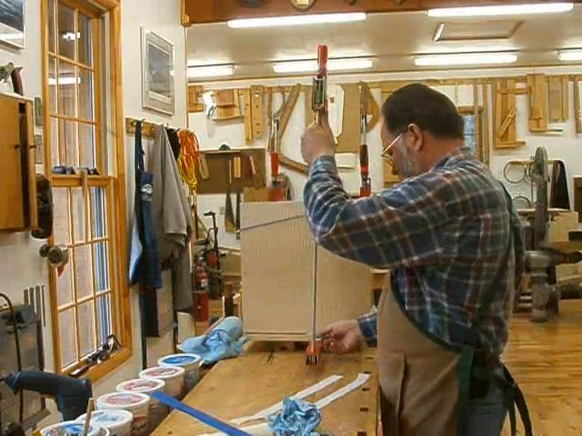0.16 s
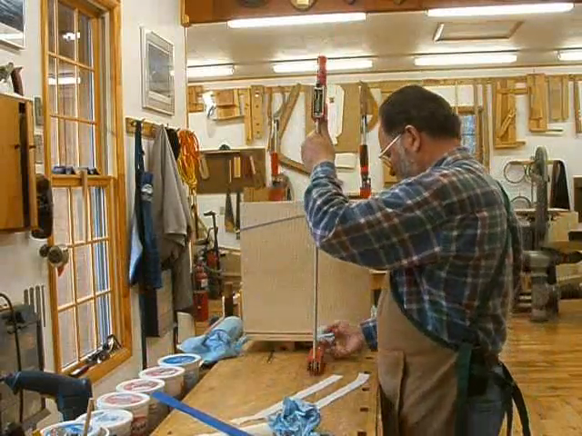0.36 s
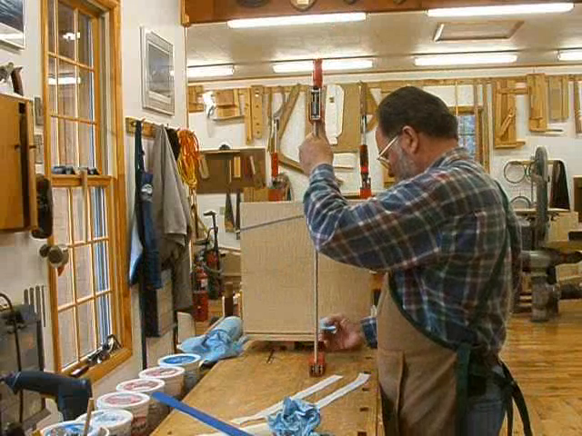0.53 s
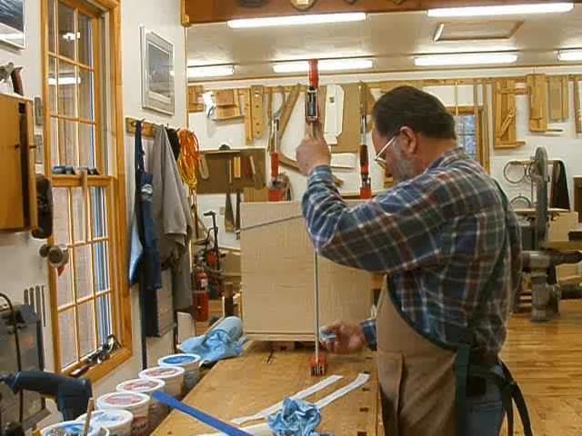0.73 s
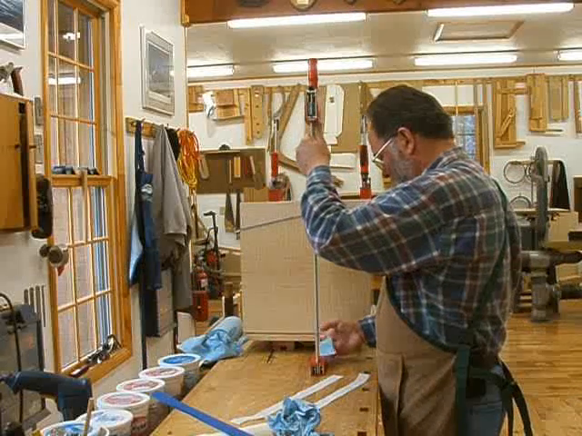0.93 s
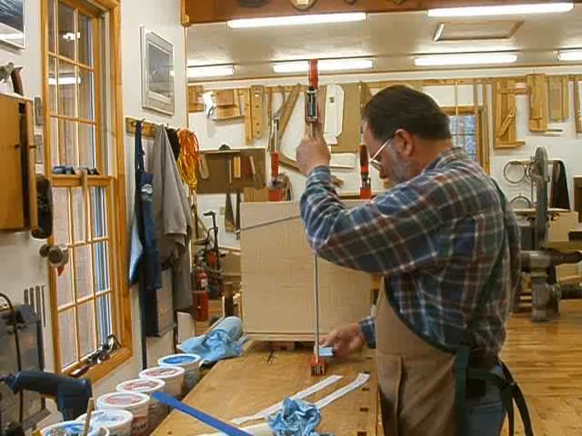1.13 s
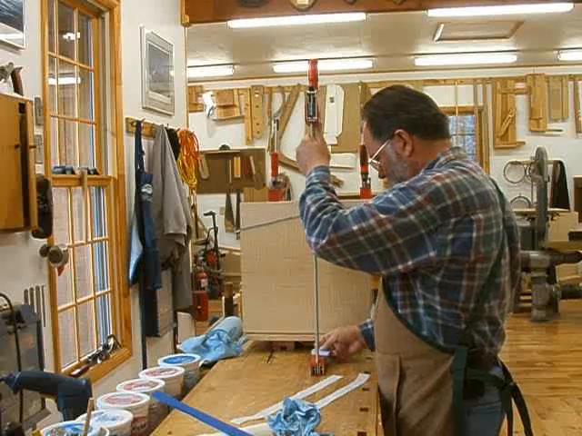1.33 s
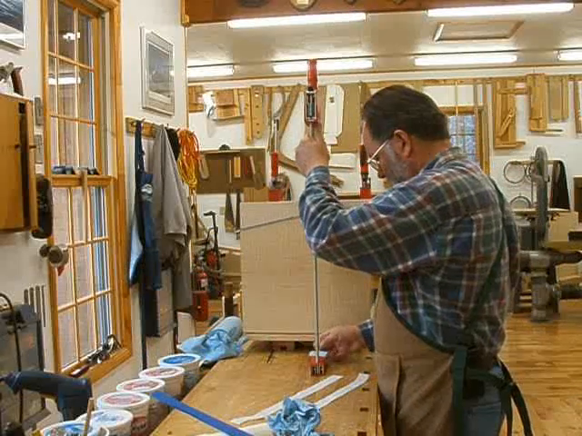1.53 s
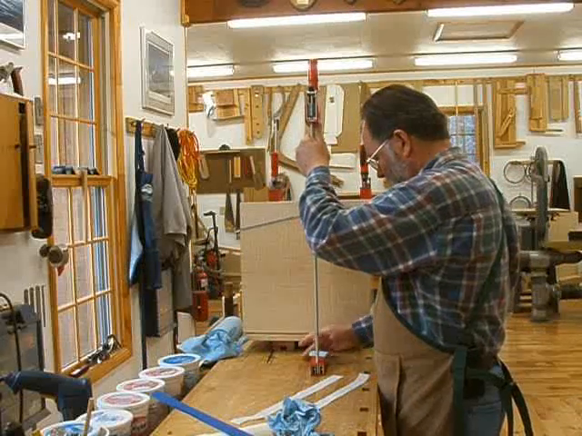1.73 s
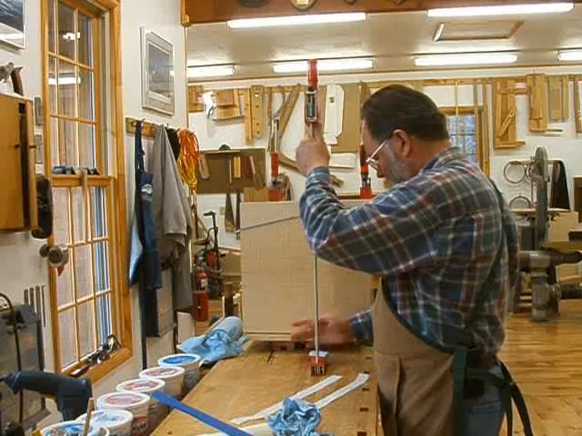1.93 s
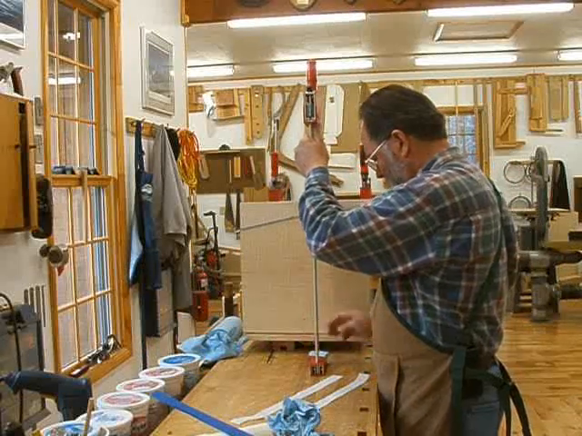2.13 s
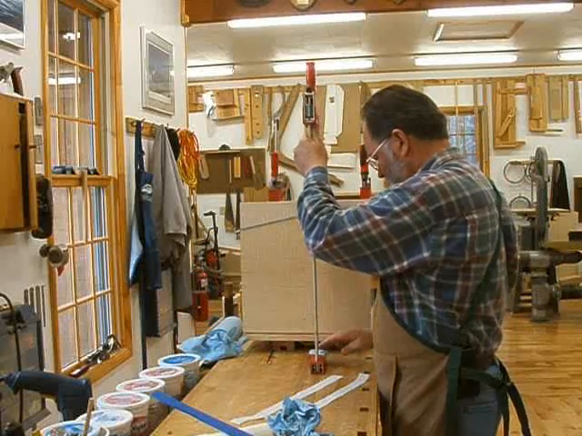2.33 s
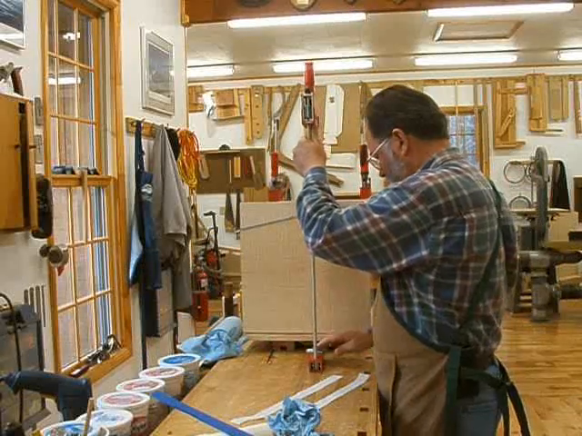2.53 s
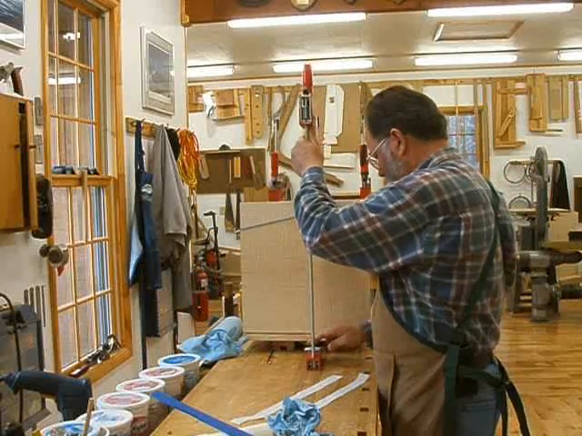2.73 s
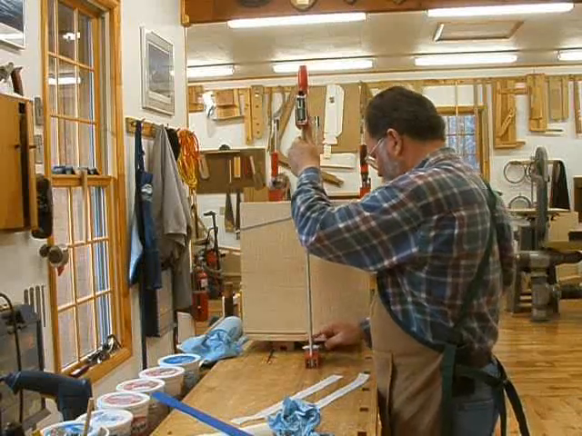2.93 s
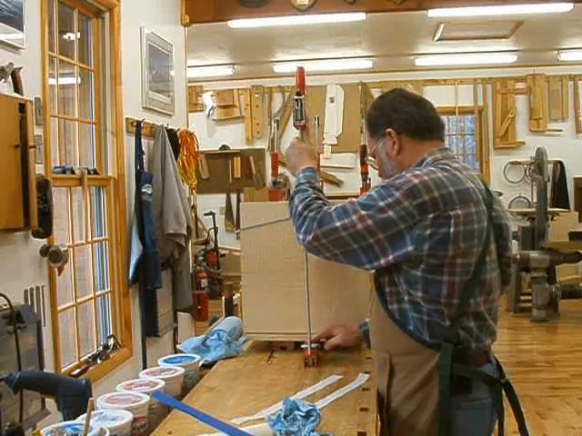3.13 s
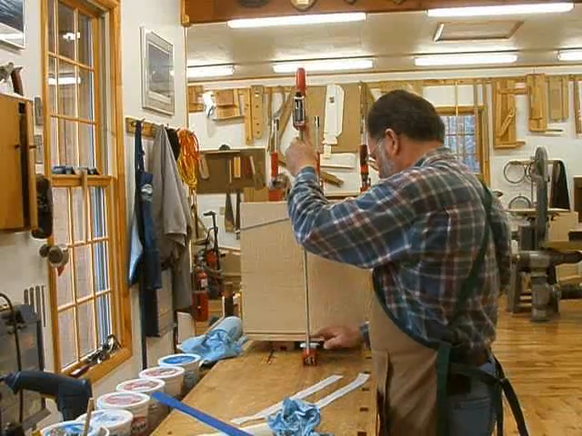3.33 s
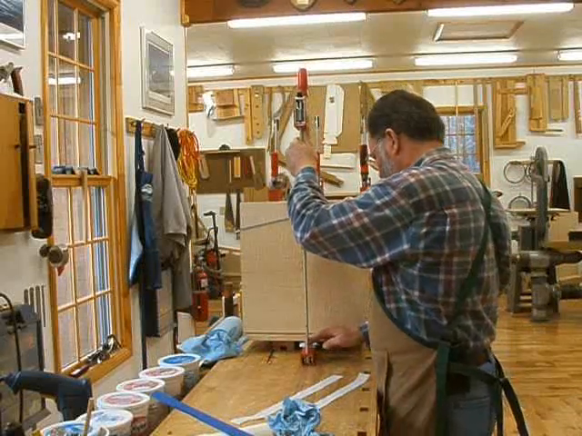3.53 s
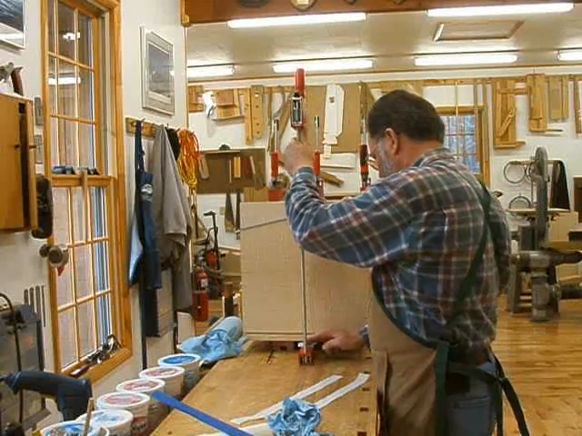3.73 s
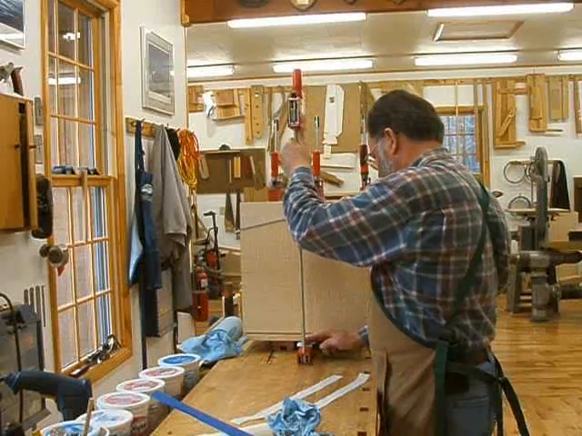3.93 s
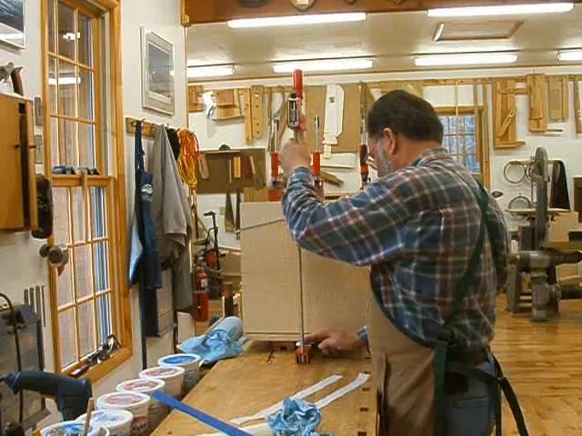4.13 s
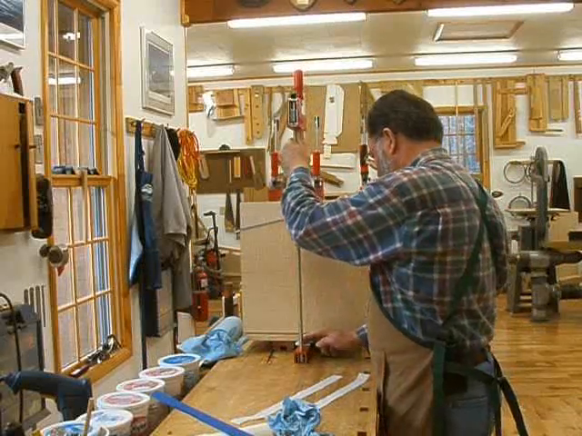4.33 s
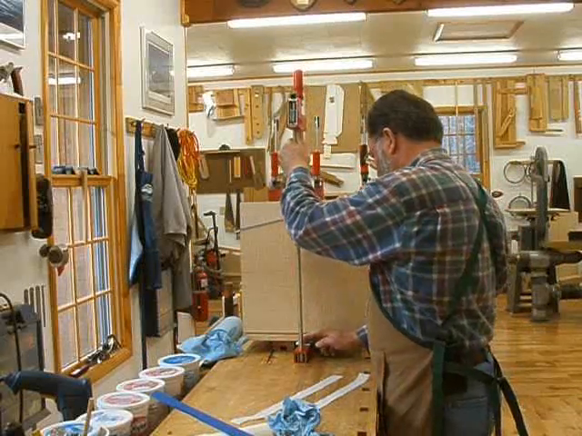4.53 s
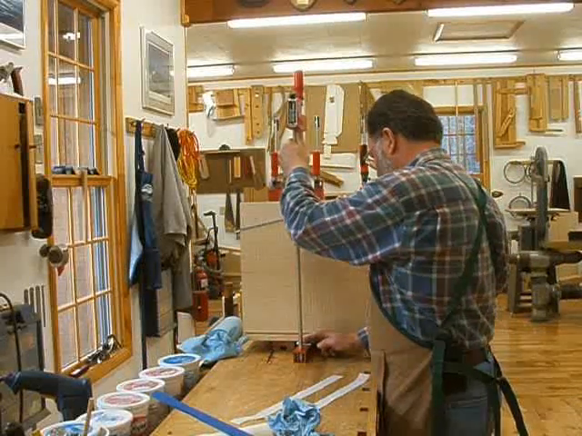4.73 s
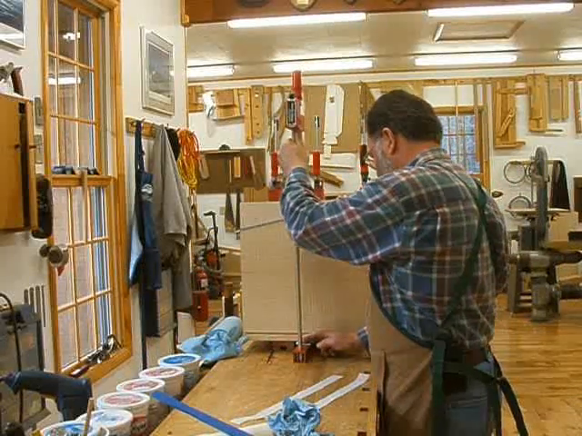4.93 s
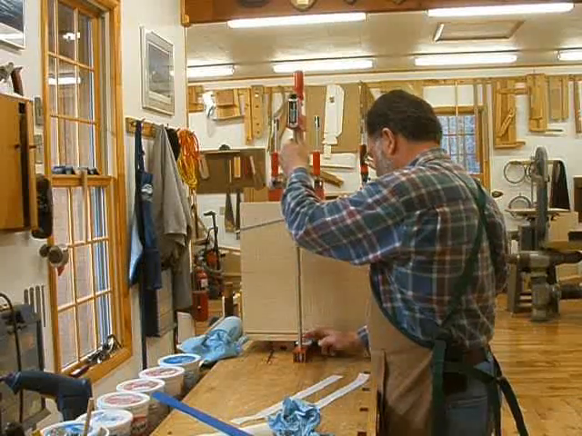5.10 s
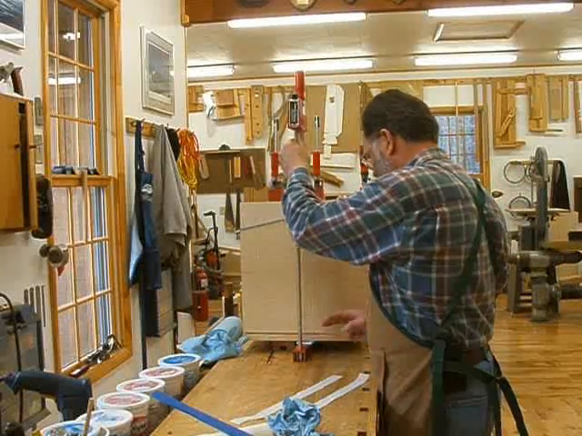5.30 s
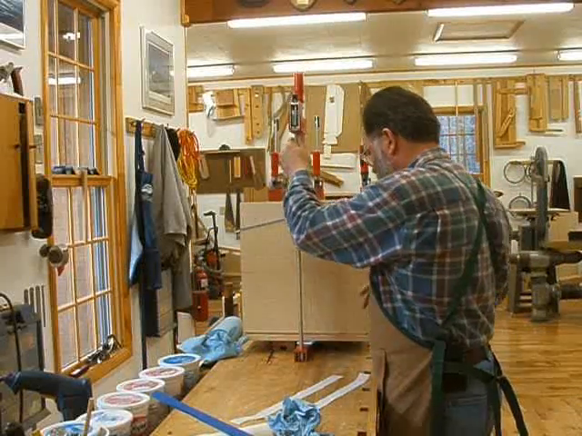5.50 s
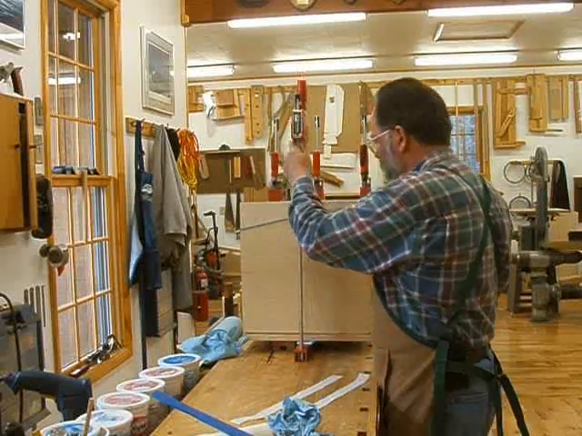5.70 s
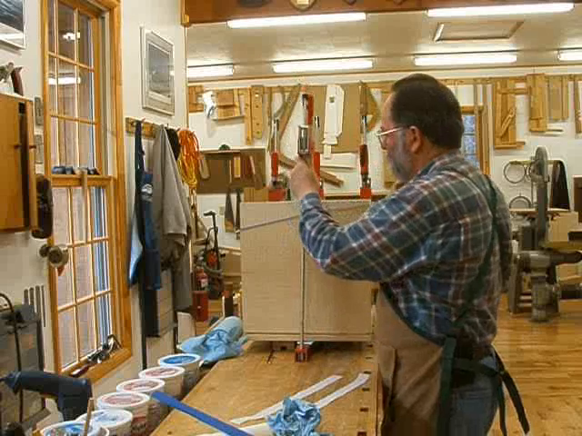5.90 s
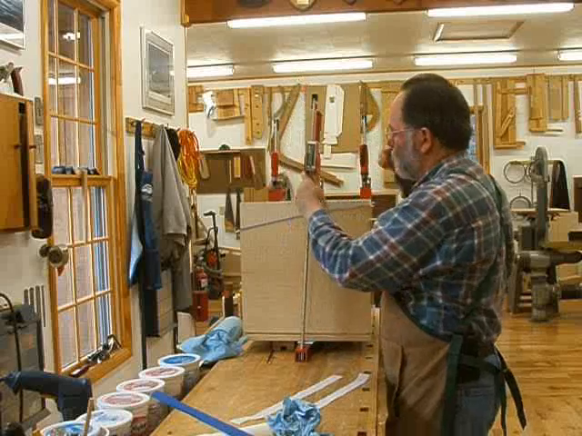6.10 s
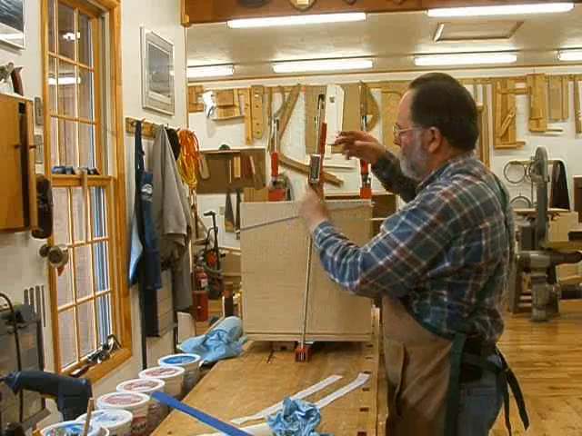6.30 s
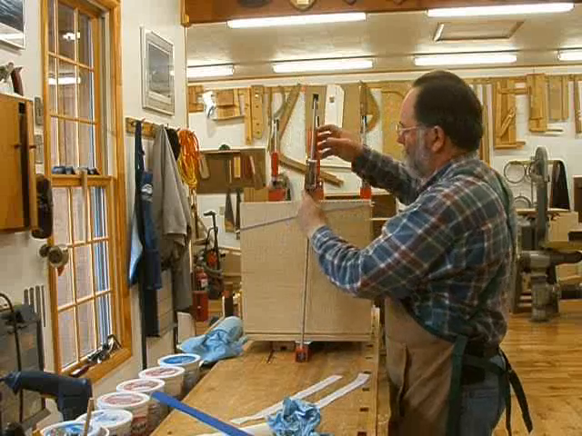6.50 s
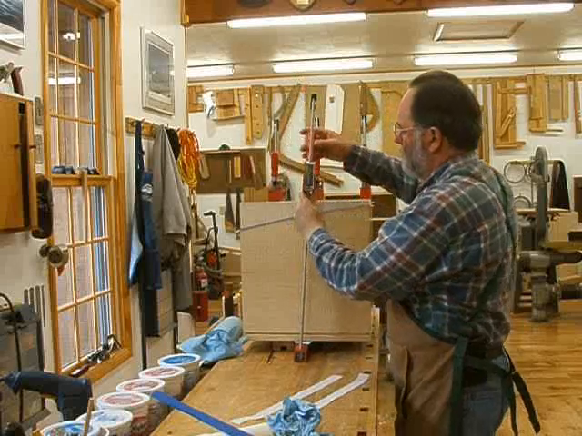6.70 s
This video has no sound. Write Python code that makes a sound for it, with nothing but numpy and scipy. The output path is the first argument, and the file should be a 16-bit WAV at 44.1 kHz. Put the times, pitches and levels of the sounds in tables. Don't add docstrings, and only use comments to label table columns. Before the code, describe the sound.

A workshop heard through a small, coarse, grainy camera microphone: low fan air, faint unsteady electrical hum and a thin, wavering high-pitched whine throughout. At about 0.25 s there is a soft woody nudge. At 0.6 s a steel bar clamp lands on the bench with a loud, bright, tightly clustered metal clack and a low wooden thump, leaving a short room echo. From about 0.7 to 5 s it is mostly quiet, with faint rubbing of a pad, firmer around 2.7 and 3.2 s, and tiny taps near 3.1 to 3.6 s. At 5.6 s a soft thump starts the jaw sliding; the scrape swells to a fast, ticking, squealing metallic rush around 5.9 to 6.2 s, the bar ringing and the plywood box groaning briefly. It slows with catches and a dull knock near 6.35 s, stops with a sharp clack at 6.5 s, then light metallic touches at 6.6 to 6.7 s.

```python
import sys
import numpy as np
from scipy import signal
from scipy.fft import rfft, irfft, next_fast_len
from scipy.io import wavfile
from scipy.ndimage import map_coordinates

SR = 44100
rng = np.random.default_rng(int(sys.argv[2]) if len(sys.argv) > 2 else 0)


def output_pcm(signal):
    pcm = np.clip(np.atleast_2d(signal).T, -1, 1) * 32767
    wavfile.write(sys.argv[1], SR, np.round(pcm).astype(np.int16))


def gain_from_db(level_db):
    decades = np.asarray(level_db, float) / 20
    return 10 ** decades


N = 297675
TIME = np.arange(N) / SR


def unit(x):
    return x / np.sqrt(np.mean(x ** 2) + 1e-20)


def along(points, hz):
    f, value = np.transpose(points)
    return np.interp(np.log(hz + 1), np.log(f + 1), value)


def wobble(rate):
    knots = rng.standard_normal(int(N / SR * 400))
    return map_coordinates(knots, [TIME * min(rate, 390)])


def sine(hz):
    return np.sin(2 * np.pi * np.cumsum(hz) / SR)


def filtered(x, response):
    m = next_fast_len(N + SR // 2)
    return irfft(rfft(x, m) * response(np.fft.rfftfreq(m, 1 / SR)), m)[:N]


def resonant(x, modes):
    def response(f):
        total = 0
        for k, (centre, width, db) in enumerate(modes):
            band = 1j * f * width
            total = total + (-1) ** k * gain_from_db(db) * band / (centre * centre - f * f + band)
        return total
    return filtered(x, response)


def coloured(spectrum):
    return unit(filtered(rng.standard_normal(N), lambda hz: gain_from_db(along(spectrum, hz))))


def burst(t, length):
    swell = 2 * t / length * np.exp(.5 - 2 * (t / length) ** 2)
    return rng.uniform(-1.28, 1.6, len(t)) * swell


def bell(s, span):
    return np.exp(-((TIME - s) / span) ** 2)


def swells(rows):
    return sum(gain_from_db(db) * bell(s, span) for s, db, span in rows)


# frequency in Hz, t60 in seconds.
ROOM_DECAY = [(100, 0.64), (1000, 0.7), (4000, .33), (8000, 0.28)]


def room(x):
    hz, t, z = signal.stft(rng.standard_normal(SR // 2), SR, nperseg=256)
    decay = gain_from_db(-60 * t / along(ROOM_DECAY, hz)[:, None])
    tail = signal.istft(z * decay, SR, nperseg=256)[1]
    late = np.pad(x, (300, 0))
    return signal.fftconvolve(late, tail / np.linalg.norm(tail))[:N]


# frequency in Hz, level in dB per Hz.
AIR_COLOUR = [(20, -11.5), (60, -15.5), (120, -5.5), (250, -2), (450, -5), (900, -9.5), (2300, -15),
              (8000, -21.5)]
# frequency in Hz, level in dB rms, unsteadiness in Hz.
HUM_TONES = [(117.7, -66, 12), (359.8, -59, 4), (705.4, -57.5, 2)]


def workshop():
    hum = 0
    for hz, db, drift in HUM_TONES:
        level = np.sqrt(2) * gain_from_db(db + 1.5 * wobble(6))
        hum = hum + level * sine(hz + drift * wobble(20))
    return gain_from_db(-48.5 + .6 * wobble(3)) * coloured(AIR_COLOUR) + hum


# centre in seconds, peak in dB, half length in seconds.
PAD_STROKES = [
    (1.1, -54.5, 0.55),
    (2.4, -55.5, 0.11),
    (2.68, -50, 0.2),
    (3.2, -52, 0.24),
    (4.0, -54.5, 0.57),
]
# frequency in Hz, level in dB per Hz.
CLOTH_COLOUR = [(500, -21.5), (1200, -8.5), (2200, 0.5), (2800, -3), (4500, -1), (8000, -7.5)]


def shuffle():
    return swells(PAD_STROKES) * gain_from_db(2.0 * wobble(25)) * coloured(CLOTH_COLOUR)


# start in seconds, peak in dB, resonance in Hz, width in Hz.
SOFT_TOUCHES = [(0.248, -41, 390, 500), (0.696, -32.5, 2700, 1620), (1.188, -42, 2160, 1500),
                (2.691, -43.5, 2530, 2510), (3.086, -41.5, 2950, 1950), (3.108, -41.5, 1400, 248),
                (3.274, -42, 2070, 600), (3.331, -45, 2200, 670), (3.492, -39.5, 1400, 1180),
                (3.497, -43.5, 3450, 800), (3.502, -39.5, 2020, 2490), (3.596, -36.5, 3310, 500),
                (5.615, -40.5, 2050, 1970), (6.619, -30.5, 3100, 610), (6.621, -34.5, 4500, 890),
                (6.621, -32.5, 6320, 900), (6.664, -34, 3620, 1980), (6.674, -35.5, 3830, 1980),
                (6.683, -34, 2830, 2480), (6.686, -39, 2100, 1790)]


def nudges():
    out, t = np.zeros(N + 8000), np.arange(8000) / SR
    for s, db, hz, width_hz in SOFT_TOUCHES:
        peak = signal.iirpeak(hz, hz / width_hz / 1.5, SR)
        puff = burst(t, .004 + 23 / hz)
        puff = signal.lfilter(*peak, signal.lfilter(*peak, puff))
        out[round(s * SR):][:len(t)] += gain_from_db(db) * puff / np.abs(puff).max()
    return out[:N]


# start in seconds, frequency in Hz, level in dB, t60 in seconds.
WOOD_THUMPS = [
    (0.597, 105.5, -36, 0.16),
    (0.639, 63.7, -41, 0.22),
    (.72, 98.4, -39, 0.17),
    (0.771, 60.8, -48, 0.71),
    (.25, 325.6, -43.5, 0.28),
    (5.602, 147.4, -35.5, 0.13),
    (6.352, 260, -30, 0.045),
    (6.513, 367, -37, .3),
    (6.681, 120, -32, 0.099),
]


def thumps():
    out = 0
    for s, hz, db, t60 in WOOD_THUMPS:
        age = np.maximum(TIME - s, 0)
        rise = 1 - np.exp(-age / (.065 * t60))
        out = out + gain_from_db(db - 60 * age / t60) * rise * np.sin(2 * np.pi * hz * age)
    return out


# centre in seconds, frequency in Hz, glide in Hz per second, peak in dB, octave in dB.
BOX_GROANS = [
    (5.68, 102.7, 7, -49.5, -2),
    (5.771, 106, 98, -42.5, -17),
    (5.825, 126.7, 170, -35, -11),
    (5.929, 474, 700, -43, -35),
    (6.02, 129, 60, -48, 5),
    (6.066, 128, -43, -48, 3),
    (6.14, 116, 0, -50, -9),
    (6.21, 115.2, 5, -49, 3),
    (6.47, 113.4, 303, -46, -2),
]


def groans():
    out = 0
    for s, hz, glide_hz, db, octave_db in BOX_GROANS:
        age = TIME - s
        turn = 2 * np.pi * (hz + glide_hz * age / 2) * age
        out = out + gain_from_db(db) * bell(s, .032) * (np.sin(turn) + gain_from_db(octave_db) * np.sin(2 * turn))
    return out


# time in seconds, peak in dB, loose part's ring in Hz, wood knock in dB.
METAL_CONTACTS = [(0.5919, -13, 4200, -34), (0.596, -10.5, 3420, -27), (0.6001, -11, 3270, -32.5),
                  (0.6030, -13, 2700, -50), (6.048, -23, 3580, -41), (6.0951, -25, 3740, -43),
                  (6.3764, -34, 3300, -37.5), (6.4238, -30, 1980, -32), (6.5112, -14.5, 4720, -51),
                  (6.5155, -13.5, 2930, -47), (6.5195, -18.5, 2820, -36.5), (6.525, -19.5, 2300, -40.5),
                  (6.5312, -31, 2900, -44)]
# frequency in Hz, width in Hz, level in dB.
JAW_MODES = [(1230, 380, -15), (2086, 1600, -8), (3340, 1300, -7.5), (4630, 1400, -7.5)]
# frequency in Hz, width in Hz, level in dB.
JAW_BRIGHT_MODES = [(5200, 360, -9), (6150, 1100, -9), (7210, 880, -9)]
# frequency in Hz, width in Hz, level in dB.
BENCH_MODES = [(287, 160, -2.5), (434, 120, -1), (602, 100, -0.5), (1040, 220, -8.5)]


def contacts():
    rattle_s, shudder_s, bright_db, loose_width_hz = .0045, .023, 4, 480
    drive, loose, t = np.zeros((3, N + 4000)), np.zeros(N + 4000), np.arange(4000) / SR
    for s, db, hz, knock_db in METAL_CONTACTS:
        start = round((s - rattle_s / 3) * SR)
        at = slice(start, start + len(t))
        blow = gain_from_db(db + 6.5) * burst(t, rattle_s)
        bright = gain_from_db(db + bright_db) * burst(t, rattle_s)
        knock = gain_from_db(knock_db + 12.0) * burst(t, shudder_s)
        drive[:, at] += [blow, bright, knock]
        loose[at] += gain_from_db(-0.5) * signal.lfilter(*signal.iirpeak(hz, hz / loose_width_hz, SR), blow)
    bodies = (JAW_MODES, JAW_BRIGHT_MODES, BENCH_MODES)
    return loose[:N], sum(resonant(d[:N], modes) for d, modes in zip(drive, bodies))


# time in seconds, scrape in dB.
STROKE = [
    (5.57, -69),
    (5.614, -53),
    (5.8, -48.5),
    (5.862, -44.5),
    (5.93, -37.5),
    (6.0, -38.5),
    (6.16, -38.5),
    (6.32, -42),
    (6.51, -46.5),
]
# time in seconds, extra level in dB.
NOTCH_CATCHES = [
    (5.99, 2),
    (6.048, 2),
    (6.113, 5.5),
    (6.19, -0.5),
    (6.333, 1.5),
    (6.381, 5),
    (6.428, 4),
]
# centre in seconds, peak in dB, half length in seconds.
BAR_SINGS = [
    (5.92, -52, 0.025),
    (6.022, -32, 0.042),
    (6.13, -36.5, .04),
    (6.34, -41, .025),
]
# frequency in Hz, width in Hz, level in dB.
BAR_MODES = [(500, 580, -9.5), (954, 73, -0.5), (1141, 51, 0), (1400, 400, -5), (1947, 390, -1.5),
             (2700, 920, -6.5)]
# frequency in Hz, width in Hz, level in dB.
SQUEAL_MODES = [(3310, 140, 0), (3590, 250, -2), (4500, 1000, -7.5)]
# frequency in Hz, width in Hz, level in dB.
NOTCH_MODES = [(5310, 870, -6.5), (6550, 920, 1), (7360, 90, 7), (8160, 890, 0)]
# frequency in Hz, width in Hz, level in dB.
BOX_MODES = [(120, 50, -1.5), (199.4, 45, -2.5), (298, 140, -11)]


def slide():
    stroke_db = np.interp(TIME, *np.transpose(STROKE), -120, -120)
    scrape_db = stroke_db + sum(db * bell(s, .011) for s, db in NOTCH_CATCHES)
    rush = bell(5.97, .13)
    full_db = -34.5
    tick_db = -4 + 9 * rush + .15 * (stroke_db - full_db)
    squeal_db = 3 + 2 * rush + .45 * (scrape_db - full_db)
    notches_passed = np.cumsum(260 * gain_from_db(1.5 * wobble(40))) / SR
    ticks = np.diff(np.floor(notches_passed), prepend=0)
    ticks = unit(ticks * gain_from_db(2.7 * rng.standard_normal(N)))
    judder = gain_from_db(.5 * wobble(30) + 2 * wobble(150))

    def rub(modes, tick_share):
        return unit(resonant(judder * rng.standard_normal(N) + tick_share * ticks, modes))

    noisy = gain_from_db(2) * rub(BAR_MODES, .7) + gain_from_db(squeal_db) * rub(SQUEAL_MODES, .59)
    noisy = noisy + gain_from_db(tick_db) * rub(NOTCH_MODES, .67) + gain_from_db(-13.5) * rub(BOX_MODES, 0)
    ring_gain = (swells(BAR_SINGS) + gain_from_db(stroke_db - 6)) * gain_from_db(1.5 * wobble(60))
    ring = ring_gain * sine(1076 + 10 * wobble(90))
    sliding = gain_from_db(scrape_db) * noisy
    return ring + sliding + gain_from_db(-8.5) * room(sliding)


def scene():
    loose, jaw = contacts()
    clamp = jaw + nudges()
    echo = gain_from_db(-6) * room(clamp + gain_from_db(-7.5) * loose)
    near = loose + clamp + echo + slide() + thumps() + groans() + shuffle() + workshop()
    return np.array([near, near])


CAMERA_RATE = 16001.44


def whine(t, busy):
    frame = 2 * np.pi * 30 * t
    load = np.cos(frame) + .3 * np.cos(2 * frame) + .5 * np.sin(frame / 3)
    restless = np.interp(t, TIME, wobble(300))
    pull = np.tanh(np.where(busy, .8 * load - .35 + .85 * restless, .4 * load + .8 * restless))
    hz = np.where(busy, 7690 + 235 * pull, 7850 + 160 * pull)
    swell_db = 1.5 * pull * busy + 3.5 * np.interp(t, TIME, wobble(200)) - 1.5
    tone = gain_from_db(-52.5 + swell_db) * np.cos(2 * np.pi * np.cumsum(hz) / CAMERA_RATE)
    pulse_db = 7 * 8.7 * (np.cos(frame + .3) - 1)
    blip_db = -52 + pulse_db + 3 * np.interp(t, TIME, wobble(30)) + 3 * busy - 3
    return tone + gain_from_db(blip_db) * np.cos(2 * np.pi * 7872 * t)


# frequency in Hz, gain in dB.
TOP_EDGE = [(15550, 0), (15900, -45)]


def rebuilt(x):
    hz, _, z = signal.stft(x, SR, nperseg=512)
    top = np.flatnonzero((hz > 14100) & (hz < TOP_EDGE[1][0]))
    shift = 2 * round(1550 / hz[2])
    z[top] = gain_from_db(-3) * z[top - shift] * gain_from_db(along(TOP_EDGE, hz[top]))[:, None]
    return signal.istft(z, SR, nperseg=512)[1][:N]


def band_limit(x):
    return signal.sosfilt(signal.butter(12, 15880, fs=SR, output="sos"), x)


# start in seconds, busy from 0 to 1.
CAMERA_LOAD = [
    (0, 0),
    (.6, 1),
    (1.6, 0),
    (2.6, 1),
    (4.6, 0),
    (5.6, 1),
    (6.45, 0),
]


def record(dry):
    step = 1 / 128
    t = np.arange(round(N * CAMERA_RATE / SR)) / CAMERA_RATE
    starts, state = np.transpose(CAMERA_LOAD)
    busy = state[np.searchsorted(starts, t, "right") - 1]
    offset = -.0035 + .0009 * busy
    heard = signal.resample(dry[0], len(t)) + whine(t, busy) + offset
    stepped = step * np.round(heard / step)
    doubled = signal.resample(np.repeat(stepped, 2), N)
    played = rebuilt(filtered(doubled, lambda hz: gain_from_db(along(TOP_EDGE, hz))))
    return band_limit(np.array([played, played]))


dry = scene()
out = record(dry)
output_pcm(out)
```